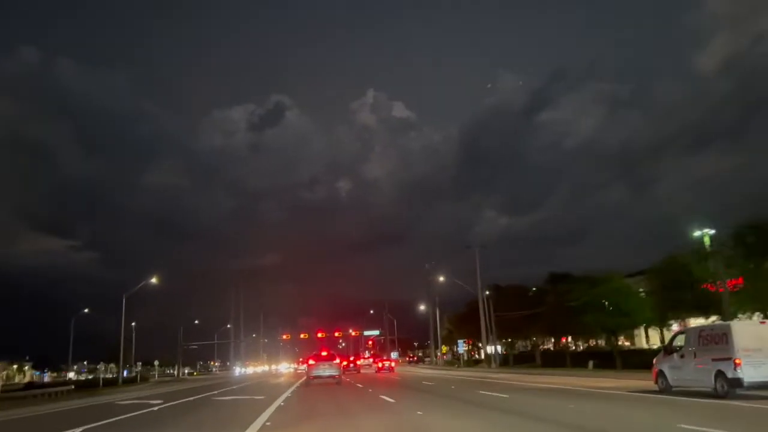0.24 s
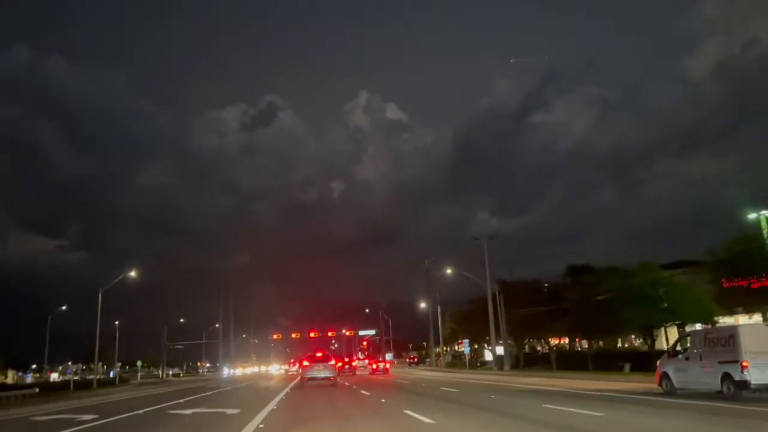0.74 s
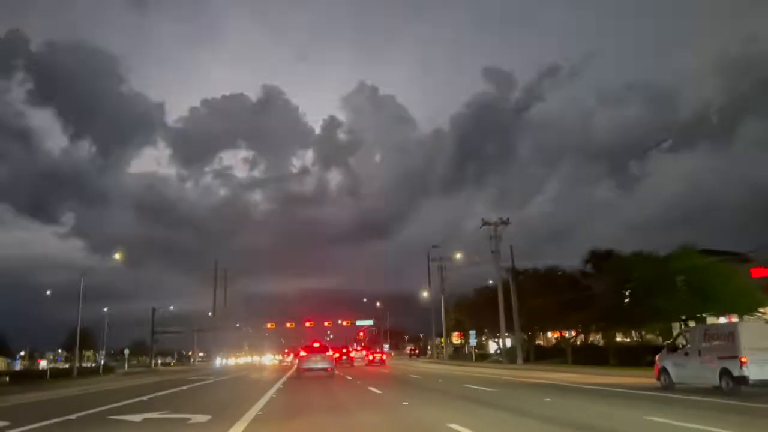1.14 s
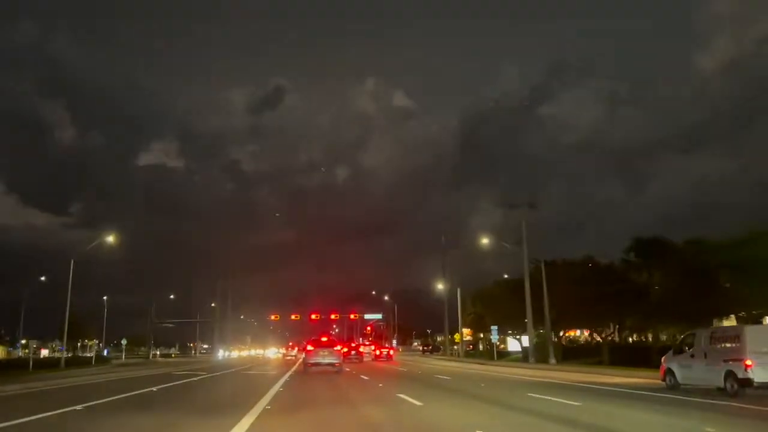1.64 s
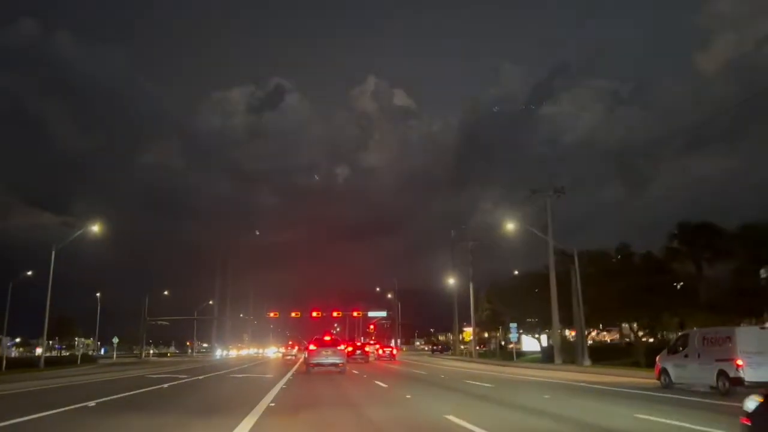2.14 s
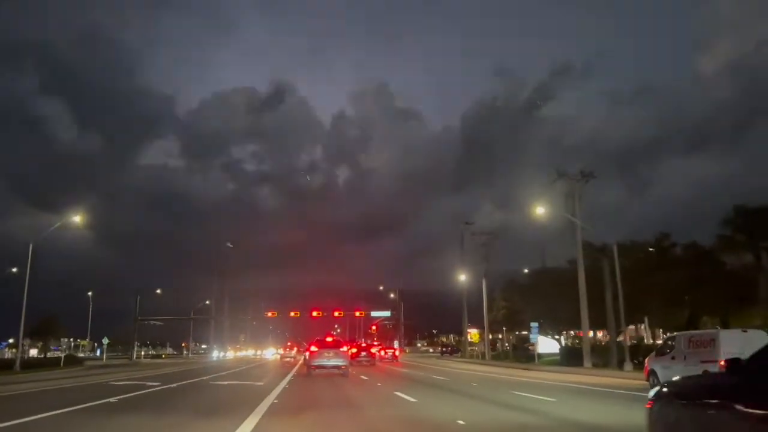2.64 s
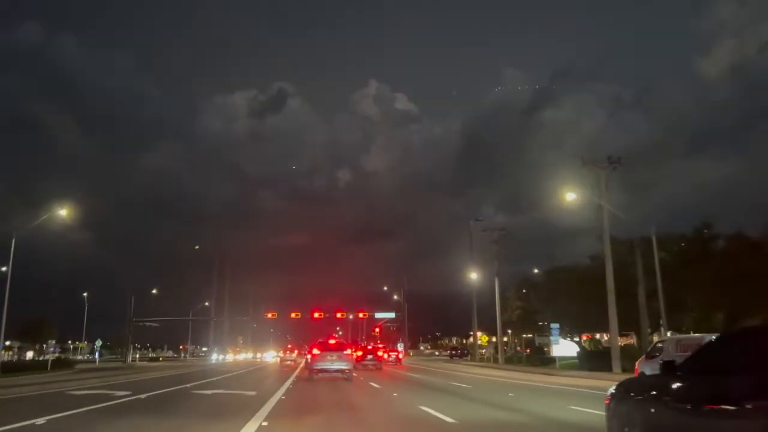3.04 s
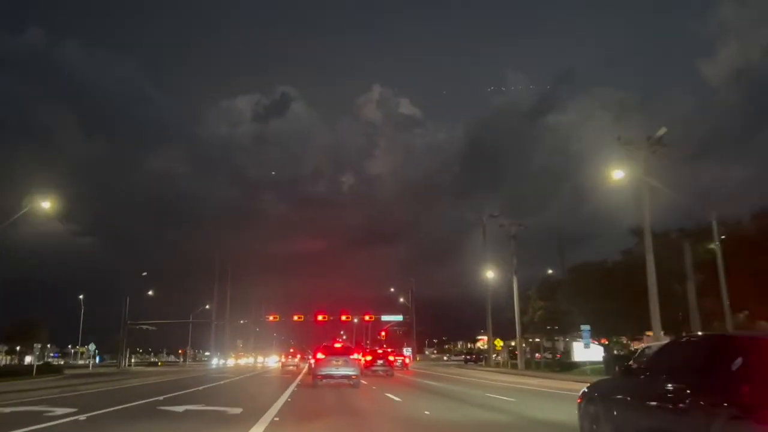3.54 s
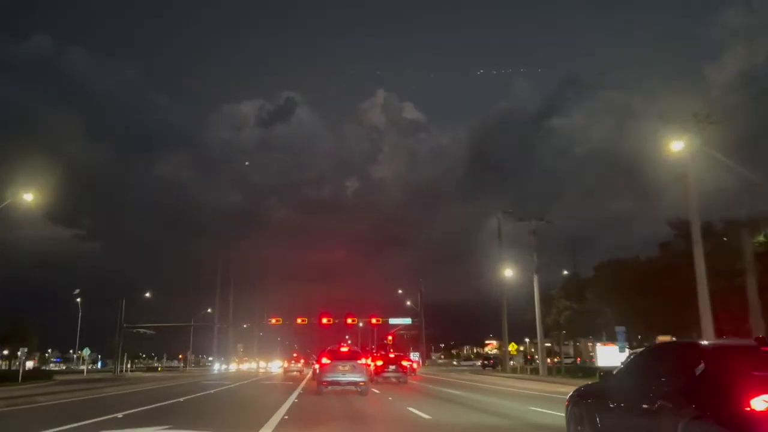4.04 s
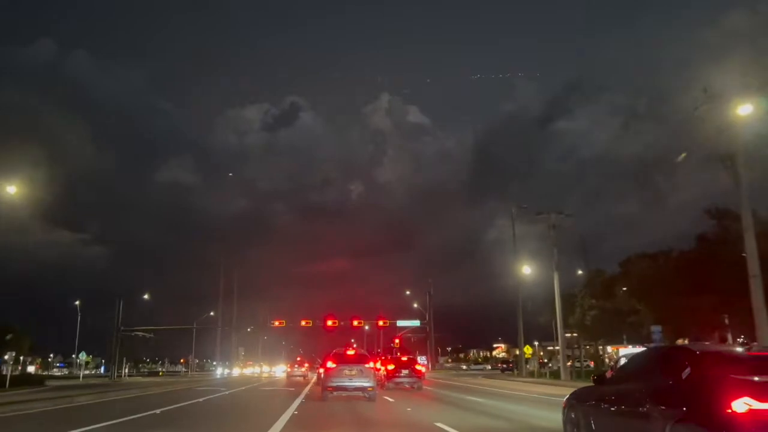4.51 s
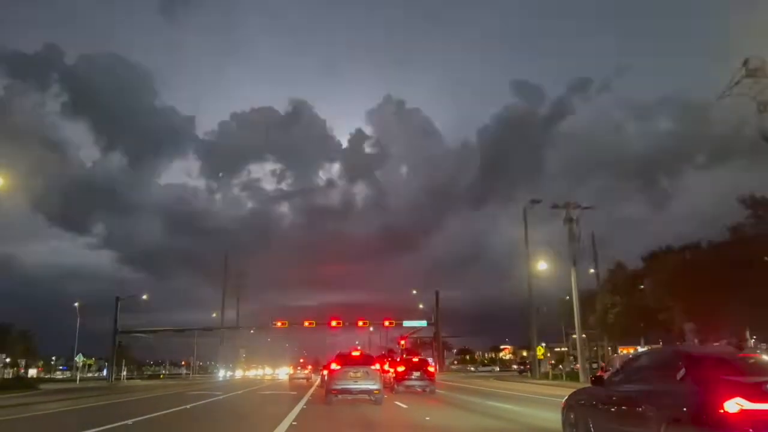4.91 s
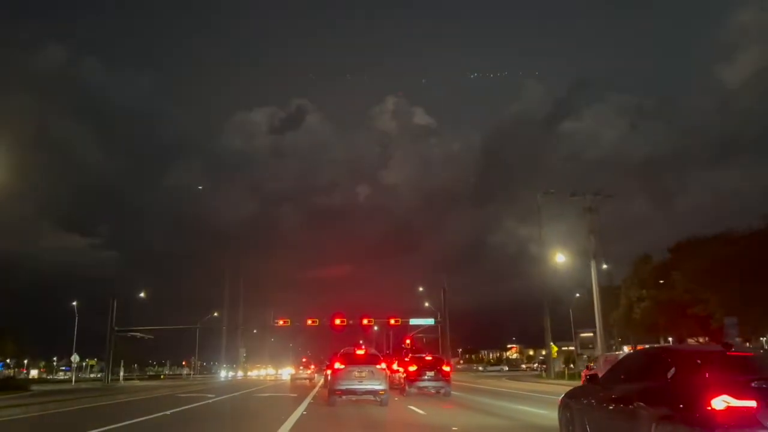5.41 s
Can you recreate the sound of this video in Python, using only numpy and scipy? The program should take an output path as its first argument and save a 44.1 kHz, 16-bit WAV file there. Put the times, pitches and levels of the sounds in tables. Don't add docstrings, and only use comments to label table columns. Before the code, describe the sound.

Low, wavering engine drone and softening road roar heard from a car cabin, with constant airy rush and occasional small rain taps.

```python
import sys
import numpy as np
from scipy import signal
from scipy.fft import rfft, irfft
from scipy.io import wavfile
from scipy.ndimage import uniform_filter1d

SR = 44100
rng = np.random.default_rng(int(sys.argv[2]) if len(sys.argv) > 2 else 0)


def makeup_ratio(level_db):
    decades = np.asarray(level_db, float) / 20
    return 10 ** decades


def bounce(signal):
    frames = np.transpose(np.atleast_2d(signal))
    limited = np.clip(frames, -1, 1)
    pcm = np.round(limited * 32767).astype(np.int16)
    wavfile.write(sys.argv[1], SR, pcm)


N = 250047
T = np.arange(N) / SR

# [f/Hz, mid level/dB, side level/dB]
HISS = [(2440, -34.5, -28), (3400, -7, -4), (4100, -6.5, -7.5), (5570, -8, -7.5), (6940, -12, -16),
        (7300, -13, -14), (8500, -15.5, -18), (9900, -39.5, -23), (10700, -42, -18), (11270, -17.5, -14.5),
        (12300, -18.5, -37.5), (13000, -14.5, -38.5), (14800, -25.5, -49), (15300, -47, -43.5)]


def evened(x):
    return x / np.sqrt(np.mean(x ** 2) + 1e-20)


def read(points, hz, index=1):
    rows = np.transpose(points)
    return np.interp(np.log(hz + 1), np.log(rows[0] + 1), rows[index])


def curve(rows, index):
    columns = np.transpose(rows)
    return np.interp(T, columns[0], columns[index])


def bumps(rows):
    return sum(db * np.exp(-((T - s) / half) ** 2) for s, db, half in rows)


def drift(hz):
    lowpass = signal.butter(2, hz, fs=SR, output="sos")
    return evened(signal.sosfilt(lowpass, rng.standard_normal(N)))


def resonate(x, hz, width):
    turn = np.exp(2j * np.pi * np.cumsum(hz * np.ones(len(x))) / SR)
    r = np.exp(-np.pi * width / SR)
    return 2 * (turn * signal.lfilter([1 - r], [1, -r], x / turn)).real


def cabin_noise(mid_db, side_db, patchy_db, size=2048):
    # [f/Hz, mid-side likeness in step, likeness a quarter cycle apart]
    leftward = [(70, .2, -.4), (125, .15, -.3), (180, .45, .1), (260, .35, -.35), (350, .12, -.1),
                (450, .06, -.5), (550, .5, -.27), (650, .28, -.08), (750, -.27, 0), (950, .18, .12),
                (1300, 0, .05), (1600, -.27, -.38), (1850, -.27, -.22), (2200, 0, .08), (3500, .15, -.08),
                (4700, .5, -.16), (6200, .5, -.05), (7600, 0, -.17), (10000, -.08, .15)]
    hz = np.fft.rfftfreq(size, 1 / SR)
    a, b, c, d, patches = rng.standard_normal((N * 4 // size + 5, len(hz), 5)).T
    patches = uniform_filter1d(patches, size=16, axis=0)
    patches = evened(uniform_filter1d(patches, size=8, axis=1))
    streaks = rng.standard_normal(a.T.shape).T
    streaks = uniform_filter1d(streaks, size=3, axis=0)
    streaks = evened(uniform_filter1d(streaks, size=24, axis=1))
    patches = patches + 1.49 * streaks
    alike = (read(leftward, hz) + 1j * read(leftward, hz, index=2))[:, None]
    mid = a + 1j * b
    side = alike * mid + np.sqrt(np.clip(1 - abs(alike) ** 2, 0, 1)) * (c + 1j * d)
    z = np.array([mid * makeup_ratio(mid_db(hz))[:, None], side * makeup_ratio(side_db(hz))[:, None]])
    z = z * makeup_ratio(patchy_db * patches)
    mid, side = signal.istft(z, nperseg=size, noverlap=size * 3 // 4)[1][:, :N]
    return np.array([mid + side, mid - side]) / np.std(mid)


def vents():
    # [f/Hz, level/dB]
    vent_mid = [(240, -33), (400, -4.5), (455, -18), (551, -0.5), (689, -6.5), (771, -11.5), (848, 3.5),
                (1090, -8), (1400, -5), (1580, 2), (1740, -11.5), (1860, -4), (2010, -20), (2150, -12.5),
                (3150, -27), (4100, -55), (6930, -120)]
    # [f/Hz, level/dB]
    vent_side = [(240, -35.5), (400, -7), (421, -7.5), (463, -4.5), (565, -6), (605, -2), (863, -6.5),
                 (990, 0), (1100, -13.5), (1240, -9), (1350, -10), (1650, -7.5), (1770, -9), (2190, -17),
                 (3150, -25), (4100, -54.5), (6930, -120)]
    rush = cabin_noise(lambda f: read(vent_mid, f), lambda f: read(vent_side, f) + 1.6, 1.71)
    hiss = cabin_noise(lambda f: read(HISS, f) - 1.5 * np.log2(f / 3000 + .1),
                       lambda f: read(HISS, f, index=2), 1.0)
    return makeup_ratio(-50.5) * rush + makeup_ratio(-71) * hiss


def road():
    # [t/s, level/dB]
    speed = [(0, -40), (.7, -39), (1.0, -39), (1.25, -41), (1.6, -43), (2, -45), (2.5, -47), (3.5, -48.5),
             (4.2, -48.5), (5.67, -48.5)]
    # [f/Hz, level/dB per Hz]
    rumble_mid = [(22, -36), (35, -22), (60, -6.5), (76, -11.5), (116, -12), (226, -21), (278, -23.5),
                  (370, -34), (436, -40), (600, -47), (700, -48.5), (910, -84), (1540, -120)]
    # [f/Hz, side minus mid/dB]
    rumble_side = [(30, -24.5), (60, -9.5), (120, -12.5), (200, -11.5), (300, -5.5), (450, -6.5),
                   (700, -2.5)]
    # [f/Hz, level/dB per Hz]
    roar_mid = [(180, -32.5), (300, -2.5), (372, 1), (432, 0), (505, -2), (603, -13.5), (756, -10.5),
                (826, -4), (1010, -7), (1420, -11.5), (1600, -13.5), (1780, -16), (2060, -13.5),
                (2490, -23.5), (3150, -24.5), (4100, -55.5), (6930, -120)]
    # [f/Hz, level/dB per Hz]
    roar_side = [(180, -26.5), (300, -3.5), (334, -6), (384, -7), (500, -8), (547, -9), (627, -2),
                 (860, -8), (1030, -3), (1190, -6), (1350, -8.5), (1450, -18.5), (1630, -11), (2590, -26.5),
                 (3150, -34), (4100, -60), (6930, -120)]
    # [t/s, extra rumble/dB, half length/s]
    coarse = [(.02, 2, 0.034), (.15, 2, 0.14), (.93, 1.5, 0.03), (1.5, 2, 0.19), (2.3, -1.5, 0.26),
              (2.8, 1.5, 0.089), (3.12, -1, 0.049), (3.75, 1.5, .15), (4.15, 0.5, 0.043), (4.5, 1, 0.17),
              (4.9, -2, 0.11), (5.2, 1.5, 0.051)]
    rumble = cabin_noise(lambda f: read(rumble_mid, f),
                         lambda f: read(rumble_mid, f) + read(rumble_side, f), 0.89, size=4096)
    roar = cabin_noise(lambda f: read(roar_mid, f), lambda f: read(roar_side, f) + 3, 1.51)
    hiss = cabin_noise(lambda f: read(HISS, f), lambda f: read(HISS, f, index=2), 1.6)
    roar_db = curve(speed, 1)
    rumble_db = -27.5 + 0.33 * (roar_db - roar_db.max())
    rumble_db = rumble_db + 0.5 * drift(5.1) + bumps(coarse)
    roar_db = roar_db - 1.7 * np.maximum(-45.5 - roar_db, 0)
    return makeup_ratio(rumble_db) * rumble + makeup_ratio(roar_db) * (roar + makeup_ratio(-22.5) * hiss)


def singing():
    # [(f/Hz, width/Hz, side share, sag/Hz per s), spells of (start t/s, length/s, level/dB)]
    singers = [
        ((112, 9, .05, 1), [(-0.86, 2.3, -29), (1.55, 2.7, -34.5), (4, 6.6, -38)]),
        ((326.5, 8.5, 0.7, -0.5), [(1.3, 2.6, -46.5)]),
        ((961, 83, .2, 34), [(.62, 1.0, -48)]),
        ((1010, 90, .2, 63), [(1.46, 0.79, -49.5)]),
        ((1160, 54, 2, 3), [(.1, 0.97, -53.5), (.9, 1.1, -66)]),
        ((1610, 90, 1.2, 3.1), [(.5, 1.4, -65.5), (1.8, 5.5, -62.5)]),
        ((2840, 1700, .6, 100), [(.45, .9, -62)]),
        ((145.5, 34.5, 0.1, 0.5), [(-.3, 0.72, -35.5), (1.35, 0.63, -39.5)]),
        ((92, 17, .05, 7.4), [(3.45, 0.8, -33.5)]),
    ]
    skew = 0.74
    out = np.zeros((2, N))
    for (hz, width, share, sag), spells in singers:
        pitch = hz - sag * np.clip(T - spells[0][0], 0, sum(row[1] for row in spells))
        noise = rng.standard_normal((2, N))
        ring = np.array([resonate(resonate(v, pitch, width), pitch, width) for v in noise])
        swell = abs(uniform_filter1d(ring ** 2, size=800)) + 1e-12
        mid, side = (evened(v) for v in ring / swell ** .25)
        level = 0
        for s, length, db in spells:
            progress = np.clip((T - s) / length, 0, 1)
            level = level + makeup_ratio(db) * np.sin(np.pi * progress ** skew)
        out += level * np.array([mid + share * side, mid - share * side])
    return out


def rain():
    # [t/s, peak level/dB, treble lift/dB]
    fat_drops = [(0.115, -32, 0.5), (0.3489, -32.5, -0.5), (0.832, -25, 1.5), (0.8583, -34, 0),
                 (1.1294, -45.5, 1), (1.3672, -45.5, 0), (1.6142, -36, 0.5), (1.6723, -37.5, 0),
                 (1.8022, -44.5, -0.5), (1.8832, -42, 0.5), (2.119, -34.5, 0), (2.151, -40, -0.5),
                 (2.2206, -40.5, -0.5), (2.7263, -52, -0.5), (3.8122, -30.5, 1.5), (3.9433, -34.5, 0.5),
                 (4.0556, -38.5, 0), (4.1227, -53, -1), (4.5116, -41.5, -1.5), (5.0292, -37.5, -1),
                 (5.404, -35, 1.5)]
    # [t/s, peak level/dB, treble lift/dB]
    fine_drops = [(0.9146, -40.5, 9.5), (0.9215, -43.5, 12), (0.9768, -42.5, 10.5), (3.32, -49.5, 10)]
    # [f/Hz, mid level/dB, side level/dB]
    glass = [(800, -23, -14.5), (1900, -16, -11.5), (2750, 3, -10.5), (3500, 0, -10), (5540, 0, -11),
             (6800, 0.5, -9.5), (7600, -17, -17), (8800, -12, -18.5), (10400, -36.5, -19),
             (12000, -21.5, -26), (14000, -27, -25), (15700, -30, -27), (16200, -70, -65.5)]
    # [delay/s, share]
    echoes = [
        (.001, -.12),
        (.0038, .1),
        (.0052, .06),
    ]
    bending = 0.07
    out = np.zeros((2, N + 4096))
    t = np.arange(2048) / SR
    hz = np.fft.rfftfreq(2048, 1 / SR)
    colour = makeup_ratio(np.array([read(glass, hz), read(glass, hz, index=2)]))
    late = np.exp(-4j * np.pi * bending * np.sqrt(hz) - 2j * np.pi * hz * .0007) * (hz > 300)
    port_delay = np.array([[1], [1.2]])
    cabin = 1 + sum(g * np.exp(-2j * np.pi * hz * s * port_delay) for s, g in echoes)
    for drops, splash, pan_db in ((fat_drops, 0.075, 3.5), (fine_drops, 0.81, 1.0)):
        for s, db, treble_db in drops:
            spray = rng.standard_normal((2, len(t))) * makeup_ratio(-60 * t / 0.026) * np.clip(t / 0.00077, 0, 1)
            drive = 0.67 * splash * spray
            drive[:, 0] = 1 - splash
            bright = makeup_ratio(treble_db * np.clip(2 * np.log2(hz / 7000 + 0.012), -1, 1))
            mid, side = irfft(rfft(drive) * colour * bright * late * cabin)
            tick = np.array([mid + side, mid - side])[:, :1800] / abs(mid).max()
            level = makeup_ratio(db + np.array([[pan_db / 4], [-pan_db / 4]]))
            out[:, round(s * SR):][:, :tick.shape[1]] += tick * level
    return out[:, :N]


def brake():
    # [t/s, level/dB]
    squeal = [
        (1.4, -105),
        (1.52, -83),
        (1.65, -76),
        (2.1, -83.5),
        (2.7, -77),
        (3.05, -81),
        (3.35, -73),
        (3.5, -85),
        (3.6, -105),
    ]
    # [f/Hz, width/Hz, level/dB]
    pad = [(15240, 70, 0.5), (15365, 45, -3.5)]
    # [t/s, level/dB]
    whine_level = [(1.35, -110), (1.55, -90), (2.2, -92), (4, -93.5), (4.2, -95.5), (5.67, -96)]
    whine_hz = [9545, 9640]
    air = rng.standard_normal((2, N))
    sing = [sum(makeup_ratio(g) * evened(resonate(resonate(v, f, w), f, w)) for f, w, g in pad) for v in air]
    whine = sum(evened(resonate(air[0], f, 15)) for f in whine_hz)
    flutter_db = 2.5 * drift(12)
    return makeup_ratio(curve(squeal, 1) - 1.5 + flutter_db) * np.array(sing) + makeup_ratio(curve(whine_level, 1)) * whine


def engine():
    # [t/s, firing rate f/Hz, sixth-order hum level/dB]
    revs = [(0, 47.85, -6), (.35, 45.84, -4), (.65, 46.96, 1.5), (.95, 45.9, 1.5), (2.05, 44.94, 0),
            (2.25, 47.23, -0.5), (2.45, 51.26, 0), (2.65, 52.09, 0.5), (3.1, 51.02, 2.5),
            (3.35, 49.17, 0.5), (3.6, 47.65, 0), (3.95, 45.21, -2), (4.25, 43.31, -5.5), (4.6, 39.63, 1.5),
            (4.95, 39.47, 2), (5.25, 43.39, -8), (5.4, 46.12, 1.5), (5.67, 46.78, 5.5)]
    # [f/Hz, level/dB]
    boom = [(38, -19), (40, -26), (42.5, -20.5), (44.5, -18), (48, -16.5), (52, -16.5)]
    # [multiple of firing, level under the tone/dB]
    orders = [(2, -18.5), (3, -26), (4, -30)]
    # [f/Hz, level/dB]
    dash = [(235, -45), (258, -55), (270, -41.5), (278, -43), (290, -42.5), (312, -44.5)]
    # [t/s, change/dB, half length/s]
    jolts = [(0.043, -19, 0.024), (.1, 2, 0.038), (0.276, 4, 0.019), (0.326, -20, 0.027),
             (0.38, 2.5, 0.018), (0.538, -2, .07), (.94, 1.5, .02), (1.03, 4, 0.058), (1.085, -4, 0.053),
             (1.256, -16, 0.014), (1.38, 2.5, 0.12), (1.495, -5.5, 0.02), (1.855, -6.5, 0.017),
             (2.57, -2.5, 0.056), (2.69, 3, 0.04), (2.866, -2.5, 0.027), (3.003, -9, 0.014),
             (3.36, -2.5, 0.029), (4.01, 4.5, 0.011), (4.46, -11, 0.016), (4.538, 4, 0.041),
             (4.583, -11, 0.014), (4.697, 3.5, .04), (4.817, -15.5, 0.021), (4.892, -4.5, 0.035),
             (5.06, 6.5, 0.046), (5.142, -7, 0.11)]
    # [t/s, change/dB, half length/s]
    catches = [(.15, 4, .2), (.9, -4, .04), (1.08, 3, 0.09), (1.4, 0, 0.22), (2.42, -2.5, 0.056),
               (2.71, -13, 0.031), (2.95, -8, .08), (3.2, -10.5, 0.035), (3.28, -8, .015),
               (3.33, 5.5, 0.024), (3.43, -5, 0.036), (3.66, -4.5, 0.033), (3.94, 7, 0.023),
               (4.1, -10, 0.097), (4.75, -9, 0.26), (5.3, -8, .06)]
    firing = curve(revs, 1)
    turns = 2 * np.pi * np.cumsum(firing) / SR
    angle = turns + 0.12 * drift(3.9)
    angle = angle - angle[0]
    angle = angle - ((angle[-1] % (2 * np.pi)) - np.pi) * T / T[-1]
    boom_db = read(boom, firing)
    tone = makeup_ratio(boom_db + bumps(jolts) + 0.57 * drift(21)) * np.cos(angle)
    for k, db in orders:
        order_db = db - 18.0 + 0.15 * (boom_db + 15.0) + 3.0 * drift(3)
        tone = tone + makeup_ratio(order_db) * np.sin(k * turns + 0.83 * drift(4))
    hum_db = read(dash, 6 * firing) + curve(revs, 2) + bumps(catches) + 1.5 * drift(7)
    hum = makeup_ratio(hum_db) * np.sin(6 * turns + .55 * drift(8))
    return np.sqrt(2) * (tone + hum * makeup_ratio(np.array([[1.0], [-2.0]])))


def scene():
    return vents() + road() + singing() + rain() + brake() + engine()


def low_pass(x):
    return signal.sosfilt(signal.butter(12, 15800, fs=SR, output="sos"), x)


def record(dry):
    return low_pass(dry)


dry = scene()
out = record(dry)
bounce(out)
```